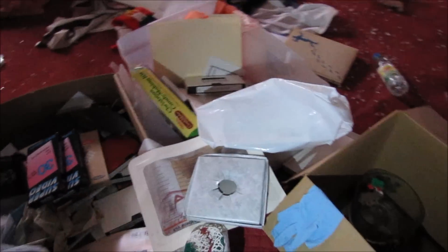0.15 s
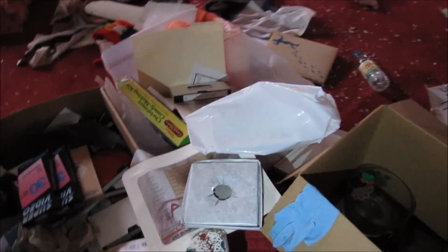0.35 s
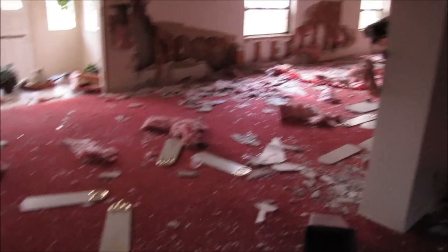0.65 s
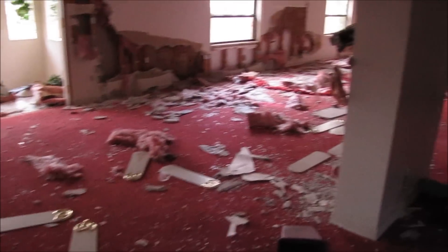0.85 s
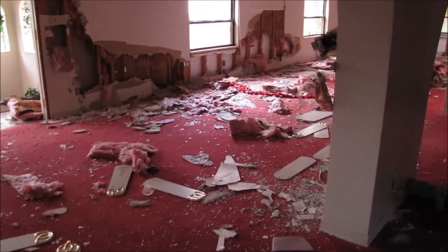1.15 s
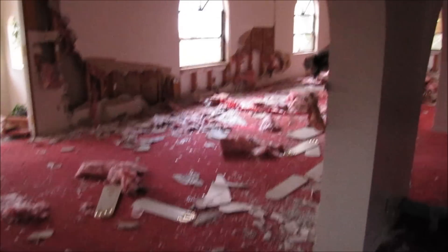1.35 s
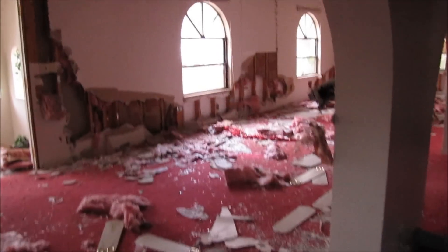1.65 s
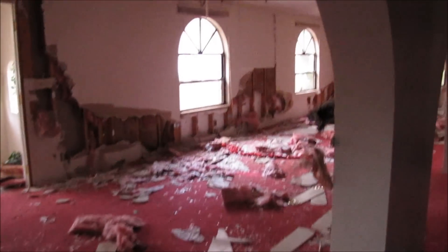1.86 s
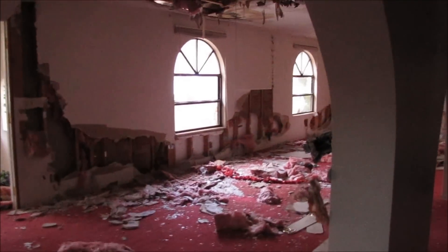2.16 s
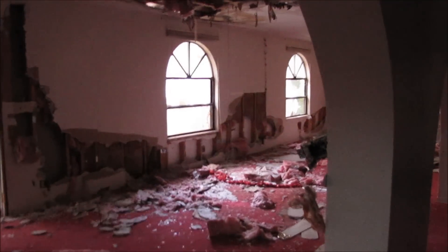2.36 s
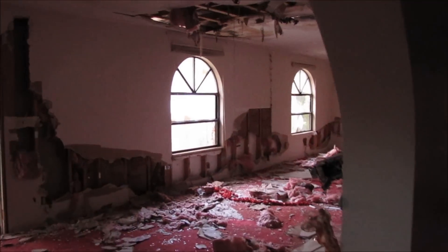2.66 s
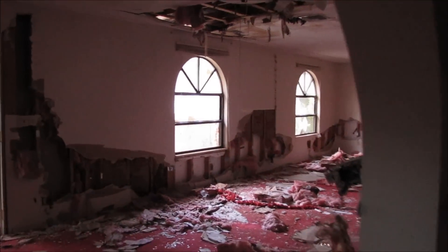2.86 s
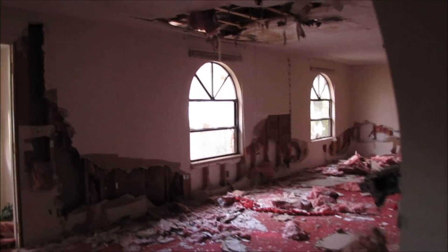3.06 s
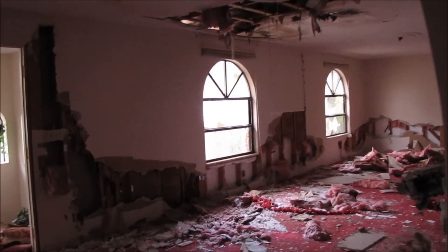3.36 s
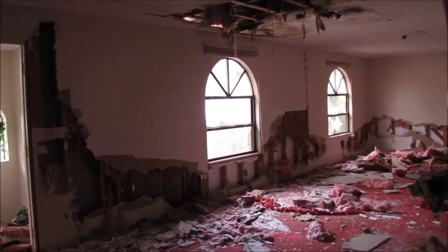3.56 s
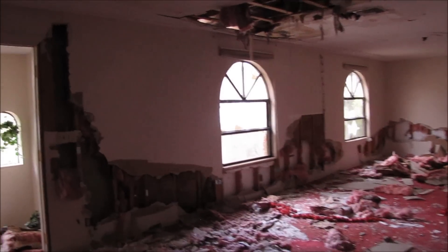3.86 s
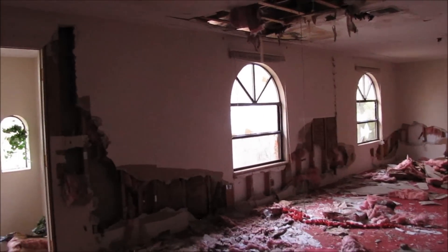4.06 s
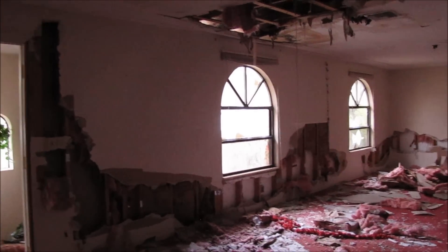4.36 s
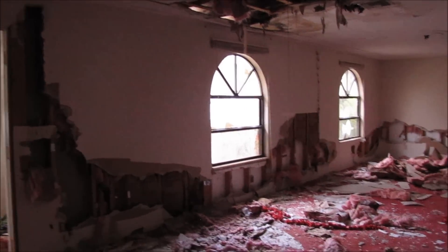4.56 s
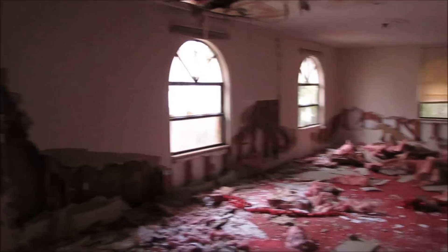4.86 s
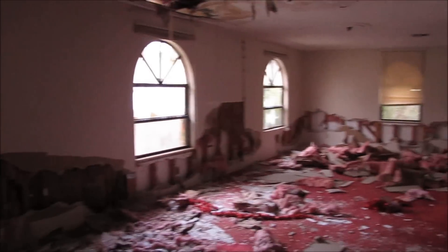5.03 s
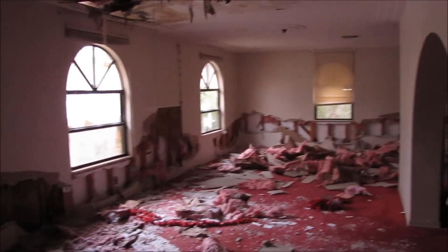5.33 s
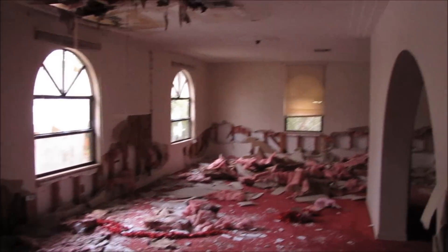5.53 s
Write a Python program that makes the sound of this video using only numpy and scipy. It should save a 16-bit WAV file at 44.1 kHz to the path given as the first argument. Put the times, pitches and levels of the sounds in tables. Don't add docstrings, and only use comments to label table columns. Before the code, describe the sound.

After brief rustling in litter, someone's steps crack a slab, a tile and shattering glass in a hollow abandoned room above distant engine drone.

```python
import sys
import numpy as np
from scipy import signal
from scipy.fft import rfft, irfft, next_fast_len
from scipy.io import wavfile
from scipy.ndimage import map_coordinates

SR = 44100
rng = np.random.default_rng(int(sys.argv[2]) if len(sys.argv) > 2 else 0)


def voltage_ratio(decibels):
    exponent = np.asarray(decibels, float) / 20
    return 10 ** exponent


def unload_wav(signal):
    wavfile.write(
        sys.argv[1],
        SR,
        np.round(np.clip(np.atleast_2d(signal).T, -1, 1) * 32767).astype(np.int16),
    )


N = 250929
CUT_S = .712
STRIDE = 16


def unit(x):
    return x / np.sqrt(np.mean(x ** 2) + 1e-20)


def along(points, hz):
    f, v = np.transpose(points)
    return np.interp(np.log(hz + 1), np.log(f + 1), v)


def curves(rows, quiet=None):
    s, *cols = np.transpose(rows)
    t = np.arange(N) / SR
    return [np.interp(t, s, c, left=quiet, right=quiet) for c in cols]


def wobble(rate_hz, coarse=False):
    at = np.arange(0, N + STRIDE, STRIDE)
    knots = rng.standard_normal(int(N * rate_hz / SR) + 4)
    x = map_coordinates(knots, [at * rate_hz / SR])
    return x[:-1] if coarse else np.interp(np.arange(N), at, x)


def swell(s, rise_db_per_s, fall_db_per_s):
    t = np.arange(0, N, STRIDE) / SR - s
    return voltage_ratio(np.where(t < 0, rise_db_per_s * t, -fall_db_per_s * t))


def filtered(x, response):
    m = next_fast_len(N + SR // 2)
    return irfft(rfft(x, m) * response(np.fft.rfftfreq(m, 1 / SR)), m)[..., :N]


def causal(tone):
    level_db = along(tone, np.fft.rfftfreq(2048, 1 / SR))
    cepstrum = irfft(np.log(voltage_ratio(level_db) + 1e-4))
    cepstrum[1:1024] *= 2
    cepstrum[1025:] = 0
    pulse = irfft(np.exp(rfft(cepstrum)))[:1024]
    return pulse / np.linalg.norm(pulse)


def spread(pair, alike):
    def mid_side(hz):
        turn = np.arccos(np.clip(along(alike, hz), -1, 1)) / 2
        return np.array([np.cos(turn), np.sin(turn)])
    mid, side = filtered(pair, mid_side)
    return np.array([mid + side, mid - side])


def rush(tone, grain_db, grain_rate):
    # pitch_hz, left_right_likeness
    noise_alike = [(60, 0.82), (130, 0.86), (290, 0.87), (640, 0.58), (1410, 0.3), (3100, 0.17),
                   (6820, -0.17), (15000, 0.14)]
    pair = rng.standard_normal((2, N)) * voltage_ratio(grain_db * wobble(grain_rate))
    coloured = filtered(pair, lambda hz: voltage_ratio(along(tone, hz)))
    return unit(spread(coloured, noise_alike))


def add(track, s, piece):
    start = round(s * SR)
    part = track[..., start:start + piece.shape[-1]]
    part += piece[..., :part.shape[-1]]


def ring(hz, db, t60, attack, unrest):
    t60_s = max(t60, .003)
    t = np.arange(int(SR * min(t60_s, 1))) / SR
    drift = unrest * np.cumsum(rng.standard_normal(len(t)))
    envelope = voltage_ratio(db - 60 * t / t60_s) * (1 - np.exp(-t / attack))
    return envelope * np.sin(2 * np.pi * hz * t + drift)


def stomp(db, hz, cycles):
    swings = np.arange(SR // 40) / SR * hz
    rounded = (swings / cycles * np.exp(1 - swings / cycles)) ** 3
    return -voltage_ratio(db) * rounded * np.sin(2 * np.pi * swings)


def snaps(events, tone, t60, boost_db, grain_db, rise=0.00024):
    track, pulse = np.zeros((2, N)), causal(tone)
    t = np.arange(int(SR * np.clip(t60, .01, .125))) / SR
    for s, db in events:
        grains = rng.standard_normal(len(t) // 16 + 1)
        sizes = voltage_ratio(grain_db * np.repeat(grains, 16)[:len(t)])
        fading = sizes * voltage_ratio(-60 * t / max(t60, .002)) * (1 - np.exp(-t / rise))
        bursts = rng.standard_normal((3, len(t))) * fading
        shared, left, right = signal.fftconvolve(bursts, pulse[None], axes=1)
        gain = voltage_ratio(db + boost_db) / np.abs(shared).max()
        add(track, s, gain * (shared + 0.28 * np.array([left, right])))
    return track


def engine():
    # time_s, main_order_db, other_orders_db (load)
    load_curve = [(0, -49, 0), (.7, -47, -2), (.72, -46.5, -13.5), (1.5, -42, -14.5), (2.02, -47, -8),
                  (2.5, -43, -6), (3.1, -45, -1), (3.8, -42, -5), (4.8, -47, 1), (5.69, -43, -1.5)]
    # time_s, firing_cycles_hz
    speed_curve = [(0, 11.45), (.7, 11.55), (.72, 9.5), (1.5, 9.55), (2.02, 9.3), (2.26, 11.5),
                   (2.42, 11.8), (2.68, 10.6), (3.6, 10.62), (3.9, 10.95), (4.15, 11.9), (4.5, 12.1),
                   (4.75, 12.3), (4.95, 13.2), (5.3, 14.5), (5.69, 14.8)]
    # pitch_hz, level_db
    wall_tone = [(20, -14), (30, -31), (53, 2), (90, -9.5), (108, -4), (130, 0), (150, -11), (200, -18)]
    # order_number, level_db
    orders = [(2, -0.5), (3, -4.5), (4, -5.5), (6, -8.5), (7, -1.5), (8, -1.5), (9, 6), (10, 1.5), (11, 2),
              (12, 2), (13, -5), (14, -3), (15, 8.5)]
    hz, db, load_db = np.array(curves(speed_curve) + curves(load_curve))[:, ::STRIDE]
    turn = 2 * np.pi * np.cumsum(hz) * STRIDE / SR
    main = voltage_ratio(3 + 1.2 * wobble(4, coarse=True)) * np.sin(turn * 5)
    rest = 0
    for k, level_db in orders:
        gain = voltage_ratio(level_db + along(wall_tone, k * hz) + 2 * wobble(4, coarse=True))
        phase = .2 * wobble(2, coarse=True) + 7 * rng.random()
        rest = rest + gain * np.sin(round(k) * turn + phase)
    hum = voltage_ratio(db) * (main + voltage_ratio(load_db - 1.5) * rest)
    return signal.resample_poly(hum, STRIDE, 1)[:N]


def cricket():
    # time_s, level_db
    cricket_level = [(.72, -66), (1, -69.5), (1.5, -68), (1.7, -78)]
    strokes = 1 + np.sin(2 * np.pi * 24 * np.arange(N) / SR + 2 * wobble(3))
    chirps = strokes ** 2 * rng.standard_normal((2, N))
    band = unit(filtered(chirps, lambda hz: np.exp(-((hz - 4900) / 450) ** 2)))
    return voltage_ratio(curves(cricket_level, quiet=-120)[0]) * band


def air():
    # time_s, traffic_db
    traffic_level = [(0, -56), (.7, -54), (1, -55), (1.5, -53), (2.1, -56), (2.3, -49), (2.5, -55.5),
                     (3.7, -56), (5.15, -55), (5.69, -51.5)]
    # pitch_hz, level_db_per_hz
    traffic_tone = [(28, -7), (48, 2.5), (66, -1), (92, -13.5), (141, -13.5), (191, -16.5), (671, -27.5),
                    (1070, -21.5), (1190, -27.5), (3500, -43), (4550, -60), (7700, -120)]
    # pitch_hz, level_db_per_hz
    hiss_tone = [(1180, -2.5), (2000, -5.5), (2510, -10), (5120, -13), (5930, -14), (11100, -19.5),
                 (15200, -25.5), (16000, -37)]
    traffic_db, = curves(traffic_level)
    hiss_db = -60 + .6 * (traffic_db - traffic_db.mean())
    traffic_gain = voltage_ratio(traffic_db + 9.5 + 0.27 * wobble(5.34))
    traffic = traffic_gain * rush(traffic_tone, grain_db=1.26, grain_rate=30)
    hiss = voltage_ratio(hiss_db + 6) * rush(hiss_tone, grain_db=0.34, grain_rate=60)
    return traffic + hiss + cricket()


def squeal():
    # time_s, level_db
    squeal_level = [(4.27, -72.5), (4.28, -56.5), (4.44, -61.5), (4.46, -70)]
    # pitch_hz, width_hz, level_db
    grit_bands = [(2450, 60, -7), (8600, 200, 0), (12550, 130, -3), (10500, 4000, -13)]

    def bands(f):
        return sum(voltage_ratio(db) * w * w / (w * w + (f - c) ** 2) for c, w, db in grit_bands)
    slips = rng.standard_normal((2, N)) * voltage_ratio(4 * wobble(90))
    return voltage_ratio(curves(squeal_level, quiet=-120)[0]) * unit(filtered(slips, bands))


def scuffs():
    # full_pressure_s, build_up_s (per 20 dB), scuff_db, crinkle_db
    press_events = [(.06, .15, -49, -52), (.33, .15, -45, -48), (.45, .4, -56, -48), (.56, .15, -51, -43.5),
                    (.71, .16, -40, -37), (3.9, .12, -52, -58), (4.05, .4, -54, -60), (4.27, .03, -43, -49),
                    (4.35, .08, -40, -56), (4.42, .2, -38, -54), (5.3, .1, -46, -50.5), (5.5, .3, -55, -55),
                    (5.58, .08, -50, -66), (5.69, .07, -45, -63)]
    # pitch_hz, level_db_per_hz
    sole_tone = [(170, -29), (320, -0.5), (570, 0), (1000, -7), (1600, -14.5), (2400, -19), (3500, -37),
                 (6600, -120)]
    # pitch_hz, level_db_per_hz
    film_tone = [(880, -18), (1500, 0), (1580, -10), (1710, -2), (5070, -6.5), (11800, -19.5), (16000, -37)]
    first = np.arange(0, N, STRIDE) < CUT_S * SR
    presses = []
    for s, build_s, sole_db, film_db in press_events:
        press = swell(s, 20 / build_s, fall_db_per_s=200) * (first == (s < CUT_S))
        presses.append(press * voltage_ratio([[sole_db], [film_db]]))
    sole, film = np.repeat(np.max(presses, axis=0), STRIDE, axis=1)[:, :N]
    sole = sole * voltage_ratio(-3) * rush(sole_tone, grain_db=2.5, grain_rate=150)
    film = film * voltage_ratio(-3) * rush(film_tone, grain_db=2.2, grain_rate=500)
    return sole + film + squeal()


def knocks():
    # start_s, peak_db, pitch_hz, crumble_db
    hollow_knocks = [(0.05, -31, 315, -4.5), (0.288, -34.5, 310, -14), (0.324, -37.5, 318, -14),
                     (0.555, -33, 320, -3), (2.9, -34, 576, -10.5), (4.3685, -29, 540, -10),
                     (4.394, -34, 570, -6), (4.41, -35, 700, -4)]
    # start_s, peak_db, pitch_hz, crumble_db
    dull_knocks = [(0.124, -25, 371, -18), (0.226, -38, 339, -7.5), (0.3575, -25, 800, -7),
                   (0.3622, -21, 560, -9), (0.3675, -22, 760, -9), (0.541, -37, 221, -12),
                   (0.642, -23, 330, -9), (2.608, -24, 400, -3), (2.612, -16, 900, -8),
                   (2.98, -33.5, 506, -5), (3.034, -36, 700, 6), (3.055, -38, 900, 6),
                   (3.803, -31, 503, -10), (4.003, -31, 330, -7), (4.27, -35, 400, 0),
                   (4.278, -36, 600, -4), (4.305, -35, 270, -6), (4.335, -27, 463, -5),
                   (4.342, -32, 520, -6), (4.389, -32, 565, -5), (4.483, -29.5, 552, -5),
                   (4.749, -26, 350, -5), (4.832, -30, 250, -6), (4.84, -28, 270, -8),
                   (5.082, -38, 495, -8.5), (5.665, -25, 323, -9.5), (5.685, -30.5, 514, -14)]
    # start_s, peak_db, pitch_hz, crumble_db
    plank_knocks = [(4.596, -17.5, 640, -9), (4.6028, -23, 600, -12), (4.61, -26, 640, -12),
                    (4.633, -31, 600, -6), (4.811, -25, 940, -8), (4.9035, -28, 920, -6)]
    # start_s, peak_db, pitch_hz, cycles_to_peak
    stomp_blows = [(2.6068, -17, 900, .9), (3.022, -7.5, 780, .55), (3.028, -7.5, 880, .55),
                   (4.2568, -21.5, 340, 1.1), (4.8106, -9, 390, .48), (4.9041, -15.5, 800, .7),
                   (5.4199, -24, 1000, .4), (5.4226, -19, 1700, .6)]
    # start_s, level_db, pitch_hz, t60_s
    heel_booms = [(.644, -24, 157, 0.068), (3.4, -30, 55, 0.37), (4.81, -26, 61.7, 0.5),
                  (4.835, -26, 240, 0.1), (4.816, -25, 94.5, 0.24)]
    # pitch_hz, level_db_per_hz
    board_tone = [(88, -41), (150, -10.5), (261, -1.5), (1020, -5.5), (1770, -14.5), (2450, -31),
                  (6000, -30), (7800, -62.5), (13200, -120)]
    track = np.zeros(N)
    for rows, swings in (dull_knocks, 3.5), (hollow_knocks, 6.5), (plank_knocks, 12):
        for s, db, hz, _ in rows:
            add(track, s + 0.00215, -ring(hz, db + 10, swings / hz, attack=0.0005, unrest=0.0015))
    for s, *blow in stomp_blows:
        add(track, s, stomp(*blow))
    for s, db, hz, t60 in heel_booms:
        add(track, s, ring(hz, db, t60, attack=0.0089, unrest=0.018))
    all_knocks = dull_knocks + hollow_knocks + plank_knocks
    crumbles = [(s + 0.00412, db + crumble_db + 1) for s, db, _, crumble_db in all_knocks]
    return track + snaps(crumbles, board_tone, .12, boost_db=2, grain_db=4.5, rise=0.0027)


def litter():
    # start_s, peak_db
    litter_snaps = [(0.06, -41), (0.1262, -38.5), (0.2264, -33), (0.2372, -30), (0.245, -36), (0.251, -34),
                    (0.2614, -43), (0.288, -37), (0.324, -39), (0.5581, -35), (0.5734, -32), (0.5894, -37),
                    (0.621, -39), (0.6357, -31), (0.6444, -26), (0.651, -31), (0.658, -33), (0.669, -35),
                    (0.686, -35), (0.7074, -34)]
    # pitch_hz, level_db_per_hz
    litter_tone = [(710, -22), (1200, 1.5), (1430, -11), (2650, -1.5), (4960, -8), (13900, -34),
                   (16000, -43.5)]
    return snaps(litter_snaps, litter_tone, .0055, boost_db=1.5, grain_db=-8)


def ringing_pieces():
    # start_s, pitch_hz, level_db, t60_s
    slab_rings = [(2.614, 1550, -20, .08), (2.622, 1730, -19, .08), (2.619, 2000, -21, .07),
                  (2.66, 2330, -35, .3), (2.658, 2584, -29, .12), (2.68, 3720, -35, .45),
                  (2.618, 4040, -19, .1), (2.62, 4150, -24, .08), (2.652, 5180, -24, .15),
                  (2.658, 5300, -20, .07), (2.688, 5190, -28, .2), (2.73, 5190, -38, .4),
                  (2.637, 8200, -24, .1), (2.68, 6455, -38, .4), (2.615, 7068, -34, .3),
                  (2.675, 9889, -37, .25), (3.157, 1745, -40, .3), (3.151, 2300, -42, .1),
                  (3.213, 2200, -42, .1), (3.145, 3900, -33, .06), (3.168, 4000, -40, .15),
                  (3.182, 4300, -46, .1), (3.216, 4200, -43, .08), (3.146, 6300, -41, .2),
                  (3.175, 5700, -51, .25), (3.26, 6280, -52, .25), (3.17, 9700, -54, .2),
                  (3.2, 11300, -57, .1), (.3597, 1400, -11, .007), (.3598, 3250, -13, .005),
                  (5.437, 7500, -46, .04), (5.449, 7500, -51, .06)]
    # start_s, pitch_hz, level_db, t60_s
    glass_rings = [(4.606, 9469, -21, .07), (4.603, 11130, -17, .05), (4.628, 11130, -10, .045),
                   (4.636, 7830, -18, .12), (4.62, 7830, -29, .3), (4.7, 7830, -40, .3),
                   (4.622, 5206, -21, .07), (4.655, 5206, -36, .3), (4.66, 4592, -34, .4),
                   (4.608, 13020, -22, .1), (4.66, 2850, -46, .5), (4.614, 12270, -31, .25),
                   (4.72, 11800, -46, .3), (4.755, 4955, -29, .2), (4.755, 5725, -34, .15),
                   (4.765, 7560, -41, .5), (4.775, 13120, -46, .3), (4.775, 10440, -47, .3),
                   (4.822, 4960, -36, .4), (4.885, 4963, -41, .45), (4.96, 4963, -50, .5),
                   (4.82, 7610, -45, .4), (4.868, 3515, -42, .1), (4.93, 3515, -53, .5),
                   (4.85, 2800, -52, .8), (4.815, 10330, -31, .12), (4.815, 10780, -31, .12),
                   (4.815, 9650, -33, .2), (4.82, 12000, -36, .2), (4.82, 13130, -38, .3),
                   (4.907, 9650, -36, .05), (4.907, 11200, -32, .05), (4.91, 5720, -43, .4),
                   (4.93, 7625, -38, .3), (4.92, 8770, -47, .25), (5.048, 10300, -57, .2),
                   (5.048, 13120, -59, .1), (5.132, 11900, -52, .25), (5.132, 13600, -61, .15),
                   (5.652, 11400, -58, .4), (5.663, 12800, -61, .15), (5.655, 13300, -61, .06),
                   (5.666, 9700, -62, .1)]
    tones = np.zeros(N)
    for s, hz, db, t60 in slab_rings + glass_rings:
        add(tones, s, ring(hz, db, t60, attack=min(.002, t60 / 20), unrest=.038))
    return tones * voltage_ratio(1 + 2.3 * wobble(45))


def ticks():
    # start_s, level_db, pitch_hz, t60_s
    clicks = [(.3599, -17, 12500, .002), (.3599, -15, 8000, .002), (.3599, -17, 5000, .002),
              (3.0283, -28, 4200, .004), (3.0445, -32, 2000, .005), (3.0565, -32, 1900, .005),
              (3.085, -34, 1600, .008), (4.256, -40, 1400, .04), (4.2755, -47, 8550, .03),
              (4.349, -46, 12500, .03), (4.351, -49, 8700, .02), (4.366, -51, 9500, .01),
              (4.387, -51, 13000, .01), (4.393, -46, 2450, .04), (4.6022, -1, 4500, .003),
              (4.6055, -9, 9450, .02), (4.6105, -6, 11100, .012), (4.6248, -4, 5000, .004),
              (4.755, -8, 11500, .004), (4.755, -12, 6200, .005), (4.7535, -20, 1600, .012),
              (4.814, -20, 2250, .012), (4.8146, -4, 11500, .003), (4.8166, -9, 10300, .015),
              (4.9075, -7, 10500, .005), (4.9076, -12, 14200, .004), (4.9228, -19, 10600, .004),
              (5.4249, -20, 2600, .003), (5.4249, -26, 7500, .004), (5.4249, -30, 13500, .003),
              (5.438, -31, 7600, .005)]
    track = np.zeros(N)
    for s, db, hz, t60 in clicks:
        add(track, s, ring(hz, db, t60, attack=.0001, unrest=0))
    return track


def bag():
    # start_s, peak_db
    bag_pops = [(.3602, -20), (.364, -26), (.3695, -27), (.374, -29), (.379, -31), (.386, -31), (.392, -33)]
    # pitch_hz, level_db_per_hz
    bag_tone = [(290, -30), (600, -8), (1350, 1.5), (1950, -16), (3300, -4), (5900, -17), (13000, -28),
                (16000, -32)]
    return snaps(bag_pops, bag_tone, .009, boost_db=2.5, grain_db=0.5)


def slab():
    # start_s, peak_db
    slab_cracks = [(2.608, -15), (2.612, -10), (2.6155, -6), (2.6195, -4), (2.6235, -6), (2.628, -5),
                   (2.638, -12), (2.645, -13), (2.652, -11), (2.661, -10), (2.67, -14)]
    # pitch_hz, level_db_per_hz
    slab_tone = [(200, -27), (570, -8), (1230, -11), (1750, 4), (2450, 3), (3100, -1), (4100, 5), (4650, 0),
                 (5400, 2.5), (8500, 3), (16000, -8)]
    return snaps(slab_cracks, slab_tone, .03, boost_db=0, grain_db=3.5, rise=0.002)


def plaster():
    # start_s, peak_db
    plaster_cracks = [(3.1457, -26), (3.1537, -28), (3.1656, -31), (3.173, -31), (3.1802, -31), (3.19, -34),
                      (3.2141, -28), (3.2211, -28), (3.2354, -35), (3.2544, -38)]
    # pitch_hz, level_db_per_hz
    plaster_tone = [(800, -40), (2100, -8), (2900, -17), (4000, -5), (5000, -14), (6100, -5), (7400, -14),
                    (9500, -15), (16000, -31)]
    return snaps(plaster_cracks, plaster_tone, .033, boost_db=1.2, grain_db=3.5, rise=0.0014)


def crumbs():
    # start_s, peak_db
    crumb_snaps = [(4.0063, -38), (4.2564, -42.5), (4.2737, -34), (5.242, -40), (5.2774, -40),
                   (5.4228, -25), (5.4365, -35), (5.449, -38), (5.49, -41), (5.5194, -41), (5.6433, -43),
                   (5.66, -44)]
    # pitch_hz, level_db_per_hz
    crumb_tone = [(500, -23), (1200, 0.5), (2400, 3), (4500, -8), (7500, -7), (13000, -19), (16000, -24)]
    return snaps(crumb_snaps, crumb_tone, .012, boost_db=-0.8, grain_db=2.5, rise=.001)


def tile():
    # start_s, peak_db
    tile_cracks = [
        (4.4877, -22),
        (4.4925, -17),
        (4.4975, -13.5),
        (4.5144, -26),
        (4.5314, -30),
        (4.563, -27),
    ]
    # pitch_hz, level_db_per_hz
    tile_tone = [(800, -33), (1500, -7.5), (2000, 0.5), (2700, -8), (3300, -14.5), (4200, -5.5), (6000, -8),
                 (11100, -13.5), (16000, -31)]
    return snaps(tile_cracks, tile_tone, .025, boost_db=0.0, grain_db=3, rise=0.00091)


def glass():
    # start_s, peak_db
    shard_snaps = [(4.6017, -3), (4.6055, -6), (4.611, -7), (4.617, -10), (4.622, -6), (4.6305, -9),
                   (4.64, -13), (4.7545, -10), (4.8143, -14), (4.822, -20), (4.845, -23), (4.909, -21),
                   (4.94, -24)]
    # pitch_hz, level_db_per_hz
    shard_tone = [(800, -24), (1700, -7), (3300, -14), (5070, -3), (8530, -7.5), (10900, -5.5),
                  (13300, -12), (16000, -20)]
    # start_s, peak_db
    chip_snaps = [(4.8145, -13), (4.8185, -13), (4.9078, -15), (4.9235, -28), (5.0494, -40), (5.1307, -40),
                  (5.4762, -39), (5.564, -45), (5.5754, -43), (5.5874, -45)]
    # pitch_hz, level_db_per_hz
    chip_tone = [(1500, -20), (2300, -11), (3500, -17), (8000, -12), (10300, 0), (12500, -6), (14700, -7),
                 (16000, -22)]
    shards = snaps(shard_snaps, shard_tone, .026, boost_db=-0.5, grain_db=0.5, rise=0.0004)
    return shards + snaps(chip_snaps, chip_tone, .014, boost_db=0.3, grain_db=1.5, rise=0.0003)


def hall(x, gap_s):
    # pitch_hz, t60_s
    hall_decay = [(150, .7), (800, 0.45), (2100, 0.54), (5500, 0.54), (14600, 0.36)]
    # pitch_hz, left_right_likeness
    echo_alike = [(60, 0.97), (180, 0.96), (550, 0.98), (1650, 0.43), (4970, -0.41), (15000, 0.31)]
    wet, step = np.zeros((2, N)), SR // 4
    for i in range(0, N, step):
        if not x[i:i + step].any():
            continue
        hz, t, z = signal.stft(rng.standard_normal((2, SR // 2)), SR, nperseg=256)
        decay = voltage_ratio(-60 * t / along(hall_decay, hz)[:, None])
        tail = signal.istft(z * decay, SR, nperseg=256)[1]
        tail = tail / np.linalg.norm(tail[0])
        add(wet, i / SR + gap_s, signal.fftconvolve(x[None, i:i + step], tail, axes=1))
    return spread(wet, echo_alike)


def floor_shake():
    # peak_s, level_db, pitch_hz, t60_s
    weight_shifts = [(.68, -51, 23.7, .3), (1.14, -37.5, 23.6, .25), (1.54, -39, 23.5, .35),
                     (2.28, -23, 16.9, 1.1), (3.15, -25, 19.5, 1.2), (4.07, -38.5, 19.5, .9),
                     (4.82, -52, 19.5, 1.5), (5.59, -44, 30, .9)]
    t = np.arange(0, N, STRIDE) / SR
    sway = 0
    for s, db, hz, t60 in weight_shifts:
        lean = swell(s, rise_db_per_s=170, fall_db_per_s=60 / t60)
        sway = sway + voltage_ratio(db) * lean * np.sin(2 * np.pi * hz * (t - s))
    return signal.resample_poly(sway, STRIDE, 1)[:N]


def at_ports(near):
    # pitch_hz, left_behind_right_rad
    port_lag = [(100, 0.13), (500, 0.083), (1000, 0.23), (2000, 0.98), (4500, 2), (8000, 2.07),
                (14000, 0.58)]
    sides = np.array([[1], [-1]])
    return filtered(near, lambda hz: np.exp(-.5j * along(port_lag, hz) * sides))


def scene():
    thud = knocks()
    tones = ringing_pieces() + ticks()
    crack = litter() + bag() + slab() + plaster() + crumbs() + tile() + glass()
    near = at_ports(crack + tones + thud)
    send = (voltage_ratio(-11) * thud + voltage_ratio(-4.5) * crack + voltage_ratio(-8.5) * tones).mean(axis=0)
    first = np.arange(N) < CUT_S * SR
    corner_echo = voltage_ratio(-7.5) * hall(send * first, gap_s=0.0065) * first
    echo = corner_echo + hall(send * ~first, gap_s=.008)
    low = voltage_ratio([[-2.1], [2.1]]) * floor_shake() + voltage_ratio([[-.8], [.8]]) * engine()
    return low + voltage_ratio([[-.7], [.7]]) * (near + echo + scuffs() + air())


def roll_off(x):
    return signal.sosfilt(signal.butter(12, 16540, fs=SR, output="sos"), x)


def record(dry):
    top_hz = 15750
    x = filtered(dry, lambda hz: 1 / (1 + (hz / top_hz) ** 60))
    mix = x / (1 + np.abs(x) ** 6) ** (1 / 6)
    return roll_off(mix)


dry = scene()
out = record(dry)
unload_wav(out)
```